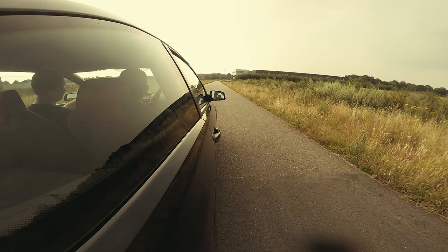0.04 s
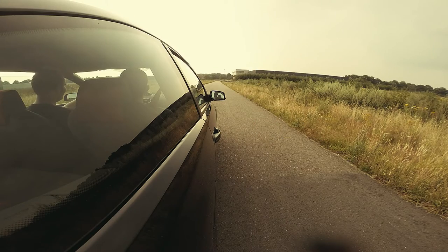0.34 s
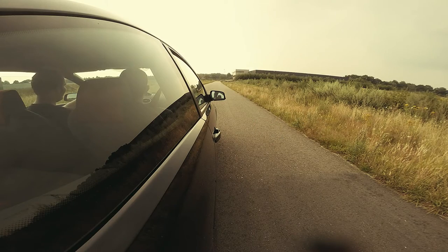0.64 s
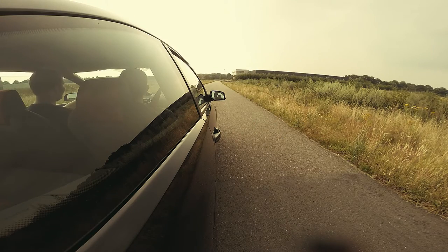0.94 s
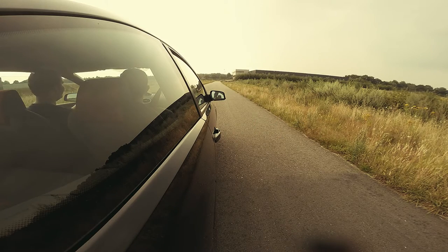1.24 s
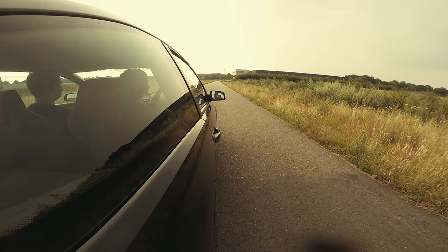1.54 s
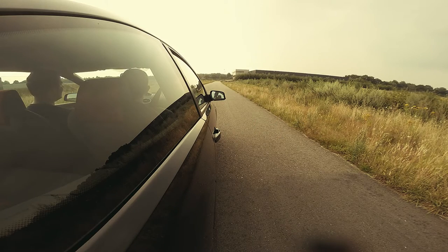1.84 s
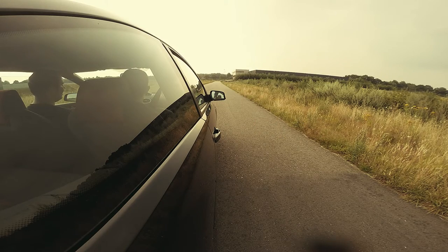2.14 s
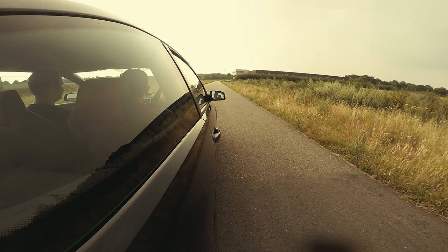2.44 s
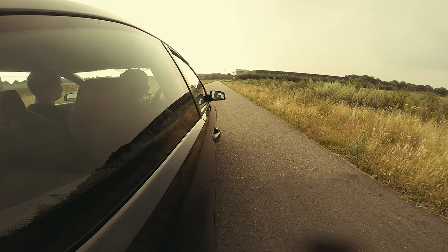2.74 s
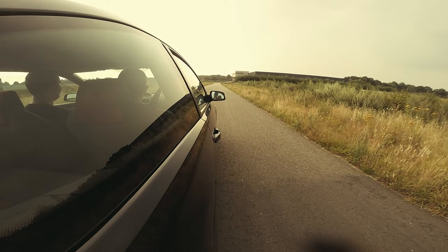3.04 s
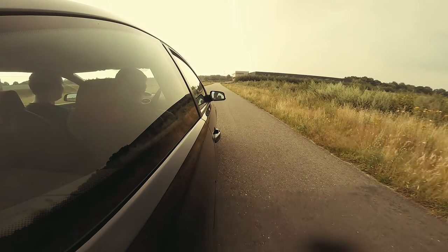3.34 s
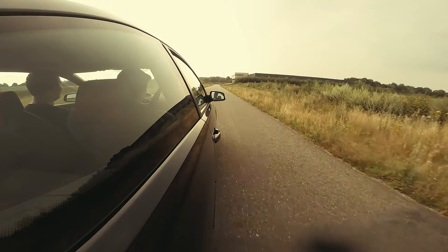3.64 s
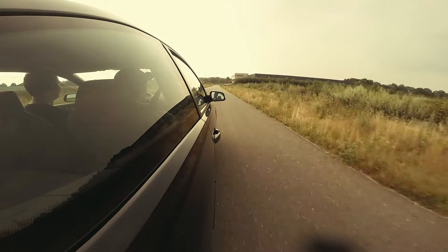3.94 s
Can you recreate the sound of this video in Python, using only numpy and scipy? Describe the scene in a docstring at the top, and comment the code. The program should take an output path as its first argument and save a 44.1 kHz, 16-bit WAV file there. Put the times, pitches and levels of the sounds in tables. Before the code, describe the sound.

A car engine idles with a low hum, then revs up as the car pulls away.

```python
"""A car engine, heard from the side, picks up to a fast idle, booms briefly, settles and pulls away.
Its exhaust tones follow the crank through the pipe's resonances, over ticking valve gear and a thin whine.
The clutch bites: the revs sag, the drivetrain knocks and the body shudders. Then the throttle opens,
the revs climb and combustion rattle, pulsed by each firing, swells into a rasping roar."""
import sys
import numpy as np
from scipy import signal
from scipy.fft import rfft, irfft
from scipy.io import wavfile

SR = 44100
rng = np.random.default_rng(int(sys.argv[2]) if len(sys.argv) > 2 else 0)


def dump(signal):
    """Clip the signal to [-1, 1] and save it as 16-bit WAV at the path in sys.argv[1]."""
    limited = np.clip(np.atleast_2d(signal).T, -1, 1)
    pcm = np.round(limited * 32767).astype(np.int16)
    wavfile.write(sys.argv[1], SR, pcm)


N = 176400
FIRINGS_PER_TURN = 5


def exhaust(speed, turns, load):
    """Over the firing tone, multiples of the crank speed grow with load and sweep the pipe resonances."""
    # The firing tone's fader. Each row: time in seconds, level in dB.
    firing_level = [(0, -34), (.1, -33.5), (.15, -38), (.3, -32), (.4, -41), (.58, -54), (1.2, -50.5),
                    (2.9, -51), (3.06, -43), (3.2, -28.5), (3.28, -32), (3.36, -42), (3.5, -31),
                    (3.75, -32), (3.88, -23), (4, -27)]
    # Exhaust tones ahead of the pipe. Each row: multiple of crank speed, dB at idle, half and full load.
    orders = [(2, -46, -40, -30), (3, -53, -41, -43), (4, -43.5, -44, -36), (6, -58, -52, -42),
              (7, -66, -54, -37), (8, -57, -56, -42), (9, -62, -43, -31), (10, -55.7, -45, -39.5),
              (11, -59.5, -47.5, -47), (12, -62, -47.5, -48.5), (13, -66, -53, -51), (14, -61.5, -61, -52),
              (15, -68, -53, -51), (16, -70, -64, -60), (18, -66, -63, -55), (20, -68, -66, -58)]
    # The pipe rings near 75, 290 and 455 Hz. Each row: frequency in Hz, gain in dB.
    pipe = [(50, -5.5), (75, .5), (98, -14), (120, -1.5), (160, -2), (205, -5), (240, -2.5), (265, 6.5),
            (292, 9.5), (320, 2.5), (350, -2.5), (380, -2.5), (415, 1.5), (455, 8), (500, -.5), (600, 2),
            (800, 6)]
    pipe_hz, pipe_db = np.transpose(pipe)
    # Faint tones in between. Each row: multiple of crank speed, dB at idle, dB at full load.
    half_orders = [(order, -66 - .9 * order, -50 - .9 * order) for order in np.arange(1.5, 15)]
    sound = from_db(in_time(firing_level)) * tone(FIRINGS_PER_TURN * turns, waver_db=1.5)
    for order, *levels in orders + half_orders:
        drive_db = np.interp(load, np.linspace(0, 1, len(levels)), levels)
        resonance_db = np.interp(np.log(order * speed), np.log(pipe_hz), pipe_db)
        sound += from_db(drive_db + resonance_db) * tone(order * turns)
    return sound


def roar(turns, rasp_depth=.26):
    """Loosely repeating combustion rattle, pulsed by every firing, in two main resonances."""
    # The roar's colour. Each row: frequency in Hz, relative level in dB.
    spectrum = [(450, -9), (600, -16), (700, -6), (850, -11), (1100, -4), (1270, 3.5), (1450, -2.5),
                (1700, -12.5), (2020, -10.5), (2280, 1), (2550, -6), (2930, -22), (3200, -9.5), (3600, -22),
                (4000, -20), (4400, -14), (4950, -27), (5600, -18), (7000, -34), (10000, -44), (15000, -56)]
    # It swells under throttle. Each row: time in seconds, level in dB.
    level = [(0, -65), (.22, -50.5), (.45, -58.5), (2.9, -60.5), (3.25, -57), (3.45, -51.5), (3.6, -48),
             (3.73, -40.5), (3.87, -36.5), (4, -33)]
    rasp = 1 + rasp_depth * np.cos(2 * np.pi * FIRINGS_PER_TURN * turns)
    rattle = crank_ticks(turns, jitter_s=.00012, spread=.77)
    return from_db(in_time(level)) * coloured(rasp * rattle, spectrum)


def body_rumble():
    """The car's body rumbles low, most strongly as it pulls away."""
    # The rumble's colour. Each row: frequency in Hz, relative level in dB.
    spectrum = [(10, -13.5), (22, 2.5), (40, -22), (75, -13.5), (100, -28), (135, -18), (200, -29),
                (250, -23), (285, -16), (315, -25), (360, -32), (520, -29), (700, -29), (950, -38)]
    # Its fader. Each row: time in seconds, level in dB.
    level = [(0, -40.5), (.35, -37.5), (.5, -44), (1.05, -40.5), (1.3, -44.5), (2.0, -46.5), (2.85, -44.5),
             (3.1, -41.5), (3.5, -32), (3.7, -30), (4, -32.5)]
    return from_db(in_time(level)) * noise(spectrum)


def boom(turns):
    """A rough boom at two and three times the crank speed as the revs settle."""
    # The boom's fader. Each row: time in seconds, level in dB.
    level = [(0, -72), (.3, -48), (.42, -41), (.52, -46), (.6, -36.5), (.9, -37.5), (1.05, -45),
             (1.25, -85), (4, -67)]
    # The low noise that roughens it. Each row: frequency in Hz, relative level in dB.
    spectrum = [(35, -2), (55, -14), (90, -9.5), (125, -16.5), (250, -23)]
    hum = tone(2 * turns) + tone(3 * turns)
    return from_db(in_time(level)) * rms_one(hum + from_db(-6) * noise(spectrum))


def clutch_judder():
    """The biting clutch shakes the body in short, very low bursts."""
    # Each row: time of the peak in seconds, width in seconds, frequency in Hz, peak level in dB.
    shudders = [(3.025, 0.038, 17, -20.5), (3.149, 0.039, 22.9, -9.5), (3.24, 0.073, 26.1, -16)]
    return sum(from_db(db) * swell(at_s, width_s) * np.cos(2 * np.pi * hz * (seconds() - at_s))
               for at_s, width_s, hz, db in shudders)


def throttle_puff():
    """A brief hiss of air as the throttle closes, then a thinner, fainter one as the idle settles."""
    # The puff's colour. Each row: frequency in Hz, relative level in dB.
    puff_spectrum = [(2000, -12), (4000, 6), (6000, 4), (8000, -10), (11000, -23), (15000, -27)]
    # The thin hiss's narrow band. Each row: frequency in Hz, relative level in dB.
    hiss_spectrum = [(5300, -20), (5750, 0), (6200, -3), (6600, -23)]
    puff = from_db(-53) * swell(at_s=.488, width_s=.043) * noise(puff_spectrum)
    hiss = from_db(-64) * swell(at_s=.82, width_s=.12) * noise(hiss_spectrum)
    return puff + hiss


def drivetrain_knocks():
    """Slack in the drivetrain closes with soft, short knocks as the clutch takes up."""
    # Each row: time of the knock's peak in seconds, level in dB.
    hits = [(2.995, -49), (3.062, -48)]
    # The knocks' colour. Each row: frequency in Hz, relative level in dB.
    spectrum = [(350, 12), (700, 11), (1000, -1), (1500, 11), (2100, 8), (2800, -12), (5000, -17)]
    return sum(from_db(db) * swell(at_s, width_s=.011) for at_s, db in hits) * noise(spectrum)


def squeak():
    """A short, narrow squeak as the car starts to roll."""
    # One sharp peak. Each row: frequency in Hz, relative level in dB.
    spectrum = [(1880, -36), (1985, 20), (2090, -16)]
    return from_db(-52) * swell(at_s=3.495, width_s=.03) * noise(spectrum)


def valve_clatter(turns):
    """The fine, dense ticking of valve gear and injectors."""
    # The ticking's colour. Each row: frequency in Hz, relative level in dB.
    spectrum = [(560, 1), (700, -2.5), (830, -5), (1050, -3), (1300, 1.5), (1950, 5), (2400, -5.5),
                (2950, -5), (3250, -4), (3600, -6), (3850, -0.5), (4100, -2.5), (4550, 2), (5000, -11.5),
                (5900, -4.5), (6400, -10.5), (7000, -17.5), (8500, -18.5), (10000, -25), (15000, -30)]
    # Its fader. Each row: time in seconds, level in dB.
    level = [(0, -56), (.2, -50), (.5, -51.5), (1.2, -52), (2.9, -53.5), (3.15, -55.5), (3.45, -53),
             (4, -46)]
    ticking = crank_ticks(turns, jitter_s=.000018, spread=.62)
    return from_db(in_time(level)) * coloured(ticking, spectrum)


def drive_whine(turns, load, idle_turns_per_s=29.2):
    """Thin tones of the engine's drives, locked to the crank and fading under load."""
    # Each row: frequency at idle in Hz, rms level in dB ahead of the load fader.
    partials = [(699.8, -67), (936.7, -69), (1168, -73), (1287, -69), (1400, -73), (1518, -68), (1637, -72),
                (1755, -72), (1868, -74), (1895, -71), (1986, -69), (2245, -69), (2336, -66), (2523, -73),
                (2568, -75), (2803, -77), (3219, -72), (3278, -77), (3499, -76), (3849, -71), (3950, -76),
                (4549, -74)]
    whine = sum(from_db(db) * np.sqrt(2) * tone(hz / idle_turns_per_s * turns, waver_db=1.5)
                for hz, db in partials)
    return from_db(-.5 - 14 * load) * whine


def crank_ticks(turns, jitter_s, spread, per_turn=200, bay_ring_s=.012):
    """Impulses at set crank angles, each a little off in time and strength, smeared by the engine bay."""
    angles = rng.random(per_turn)
    signs = rng.choice([-1, 1], per_turn)
    bay = rfft(rng.standard_normal(N) * np.exp(-seconds() / bay_ring_s), 2 * N)
    at_turn = np.arange(int(turns[-1]) + 1)[:, None] + angles
    at_s = np.interp(at_turn, turns, seconds(), right=-1) + jitter_s * rng.standard_normal(at_turn.shape)
    sizes = signs + spread * rng.standard_normal(at_turn.shape)
    heard = (at_s > 0) & (at_s < N / SR)
    train = np.bincount((at_s[heard] * SR).astype(int), sizes[heard], N)
    return irfft(rfft(train, 2 * N) * bay / np.abs(bay))[:N]  # phase only: smear without colour


def from_db(db):
    """Decibels to gain."""
    return 10 ** (np.asarray(db) / 20)


def rms_one(x):
    """Scale to unit rms."""
    return x / np.sqrt(np.mean(x ** 2) + 1e-20)


def seconds():
    """The time of every sample."""
    return np.arange(N) / SR


def in_time(rows):
    """Join (seconds, value) points by straight lines."""
    return np.interp(seconds(), *np.transpose(rows))


def swell(at_s, width_s):
    """A bell-shaped rise and fall."""
    return np.exp(-.5 * ((seconds() - at_s) / width_s) ** 2)


def drift(rate_hz):
    """Slow random wander of rms 1."""
    hop, run_in = 40, 2000  # samples a step, steps for the filter to settle
    pole = np.exp(-2 * np.pi * rate_hz * hop / SR)
    white = rng.standard_normal(N // hop + run_in + 2)
    slow = signal.lfilter([1], [1, -2 * pole, pole * pole], white)[run_in:]
    return np.interp(np.arange(N) / hop, np.arange(len(slow)), rms_one(slow))


def coloured(x, spectrum):
    """Shape x with a curve of (Hz, dB) points, falling steeply beyond its ends; rms 1."""
    hz, db = np.transpose(spectrum)
    bin_hz = np.maximum(np.arange(N + 1) * SR / (2 * N), 1)
    gain = from_db(np.interp(np.log(bin_hz), np.log(hz), db))
    skirts = np.minimum(1, np.minimum(bin_hz / hz[0], hz[-1] / bin_hz)) ** 4
    return rms_one(irfft(rfft(x, 2 * N) * gain * skirts)[:N])


def noise(spectrum):
    """Coloured noise of rms 1."""
    return coloured(rng.standard_normal(N), spectrum)


def tone(cycles, waver_db=2.4):
    """A sine that follows a running count of cycles and wavers in strength."""
    return np.sin(2 * np.pi * (cycles + rng.random())) * from_db(waver_db * drift(rate_hz=4))


def scene():
    """One crankshaft and one load drive the engine; body and clutch sounds are timed around them."""
    # The revs. Each row: time in seconds, crank turns per second.
    revs = [(0, 21), (.08, 24.2), (.16, 28.6), (.25, 30.2), (.33, 30), (.48, 28.2), (.58, 29.3),
            (1.0, 29.2), (2.88, 29.2), (2.98, 26.5), (3.06, 24.9), (3.22, 24.1), (3.3, 24.7), (3.38, 27.2),
            (3.46, 29.9), (3.54, 31.6), (3.7, 34.7), (3.86, 37.4), (4, 39.6)]
    # How hard the engine works. Each row: time in seconds, load from 0 (idle) to 1 (full).
    effort = [(0, .35), (.28, .38), (.45, .05), (.6, 0), (2.95, 0), (3.15, .3), (3.35, .45), (3.5, .6),
              (3.62, .7), (3.78, .93), (3.87, 1), (4, .97)]
    speed = in_time(revs) * (1 + .0008 * drift(rate_hz=4))
    turns = np.cumsum(speed) / SR
    load = in_time(effort)
    mix = exhaust(speed, turns, load) + roar(turns)
    mix += body_rumble() + boom(turns) + clutch_judder()
    mix += throttle_puff() + drivetrain_knocks() + squeak()
    mix += drive_whine(turns, load) + valve_clatter(turns)
    return mix[None]


def record(dry, cutoff_hz=15200):
    """The electronics whistle faintly; the top is cut."""
    # Steady electrical tones. Each row: frequency in Hz, rms level in dB.
    partials = [(8780, -79.5), (11719, -83), (14626, -90)]
    whistle = sum(from_db(db) * np.sqrt(2) * np.sin(2 * np.pi * hz * seconds()) for hz, db in partials)
    low_pass = signal.ellip(10, .1, 80, cutoff_hz, fs=SR, output="sos")
    return signal.sosfilt(low_pass, dry + whistle)


dry = scene()
out = record(dry)
dump(out)
```